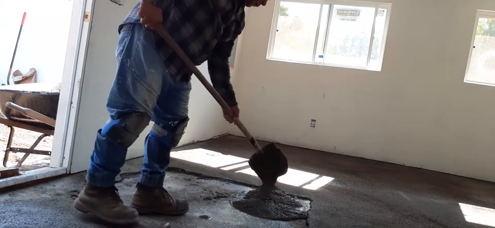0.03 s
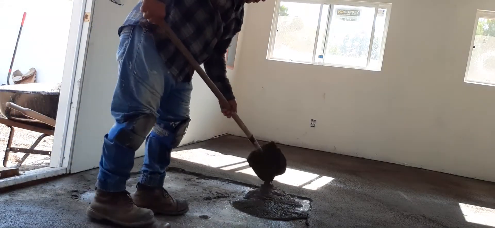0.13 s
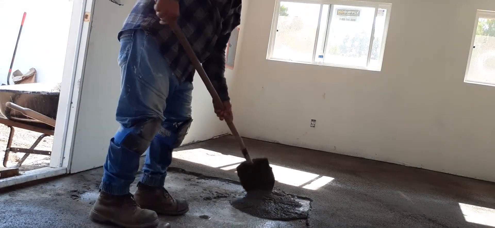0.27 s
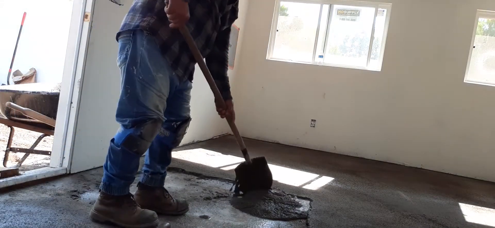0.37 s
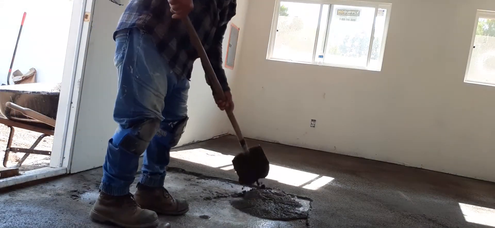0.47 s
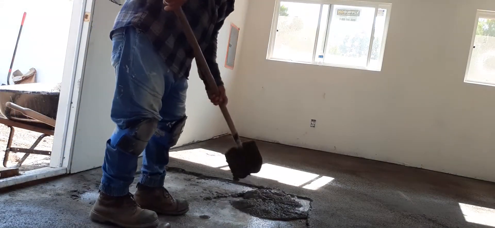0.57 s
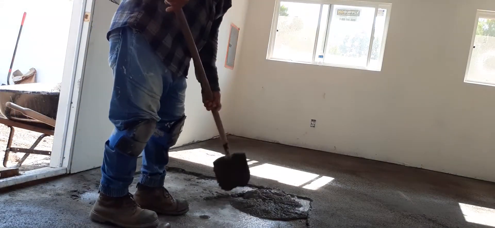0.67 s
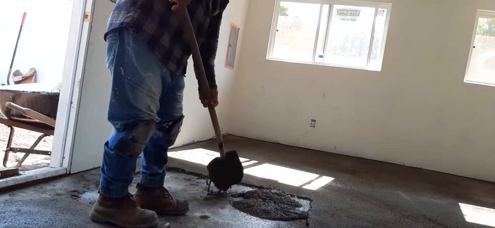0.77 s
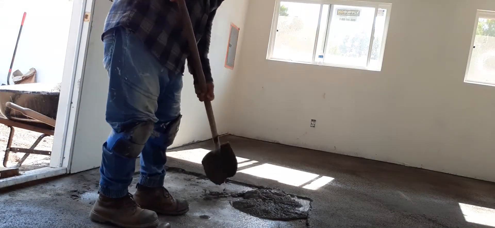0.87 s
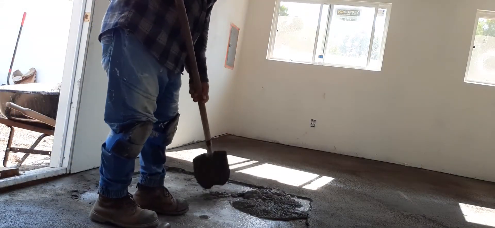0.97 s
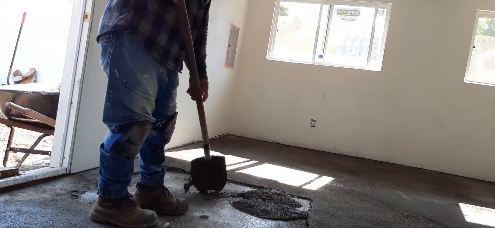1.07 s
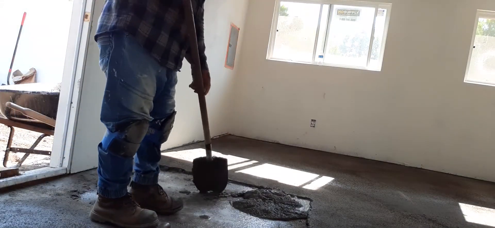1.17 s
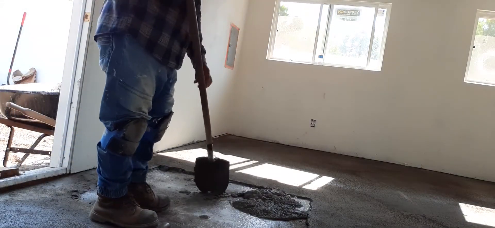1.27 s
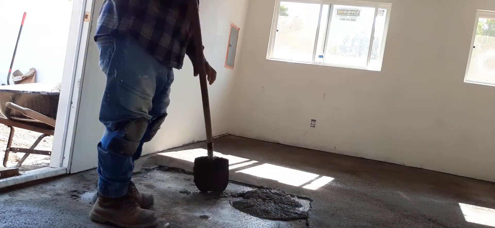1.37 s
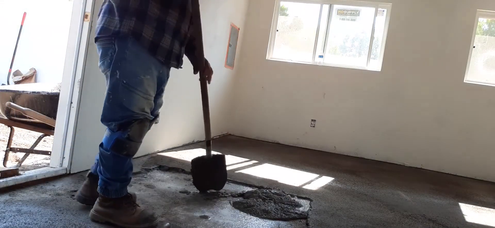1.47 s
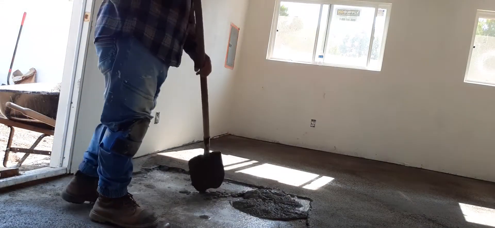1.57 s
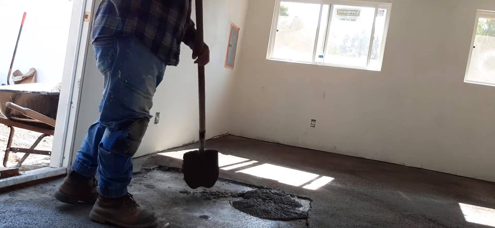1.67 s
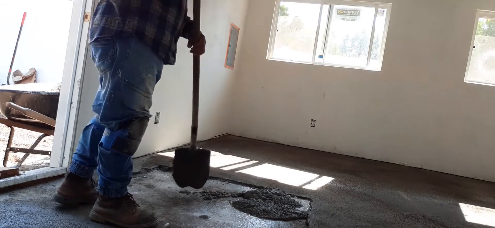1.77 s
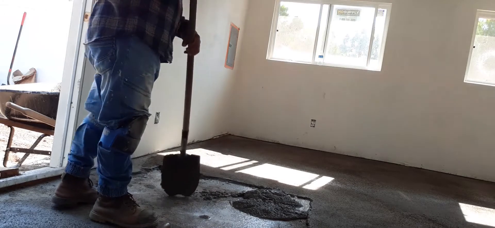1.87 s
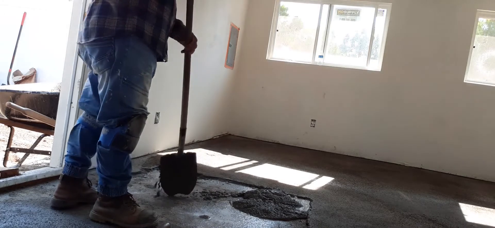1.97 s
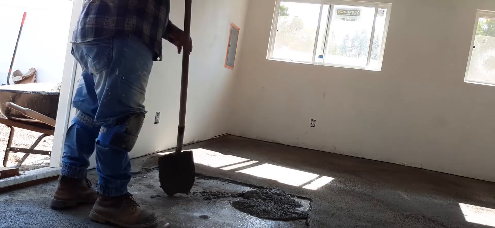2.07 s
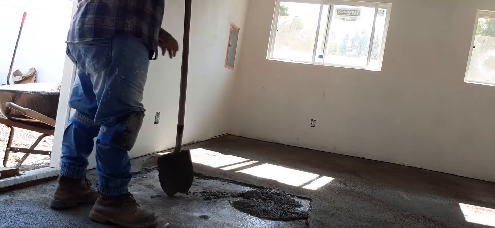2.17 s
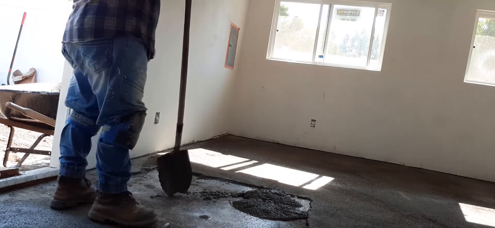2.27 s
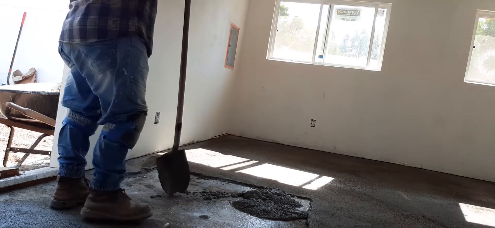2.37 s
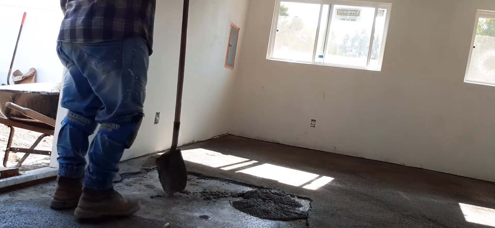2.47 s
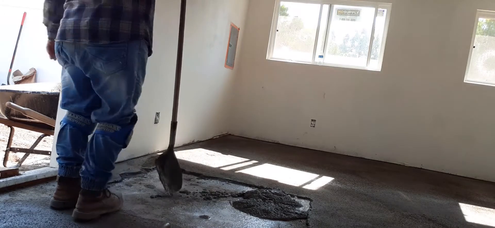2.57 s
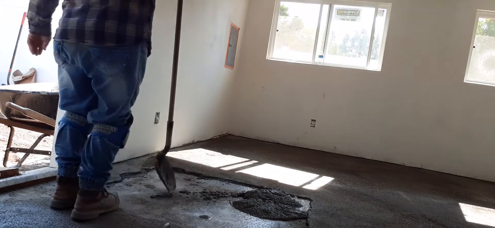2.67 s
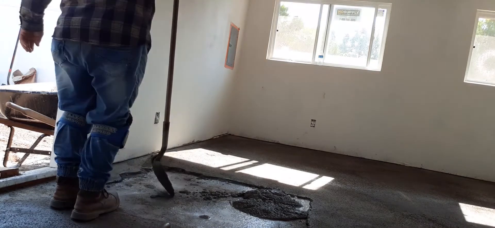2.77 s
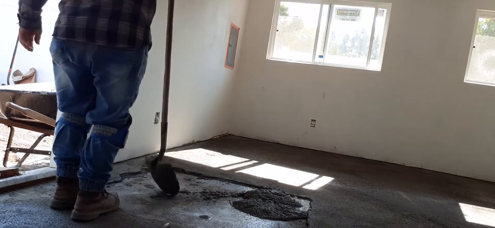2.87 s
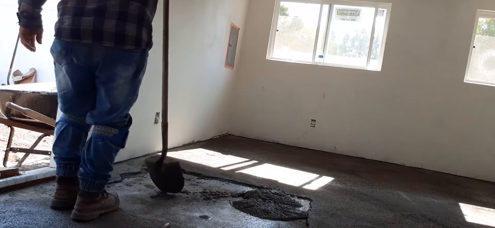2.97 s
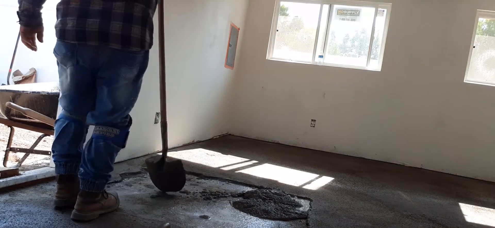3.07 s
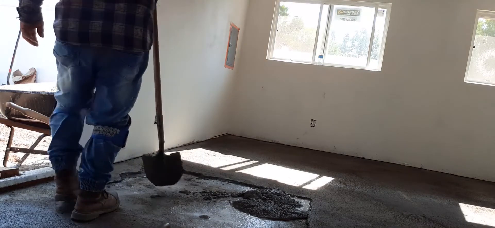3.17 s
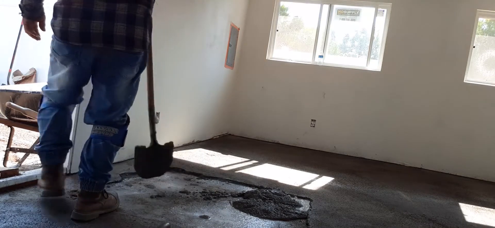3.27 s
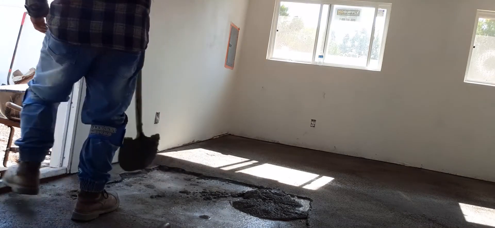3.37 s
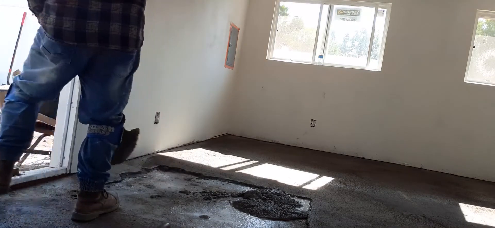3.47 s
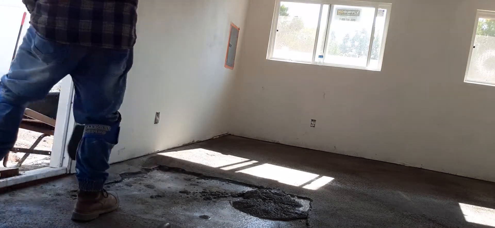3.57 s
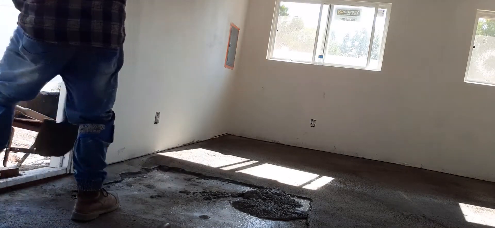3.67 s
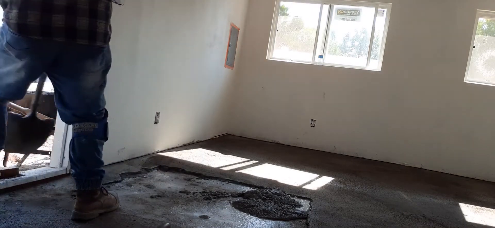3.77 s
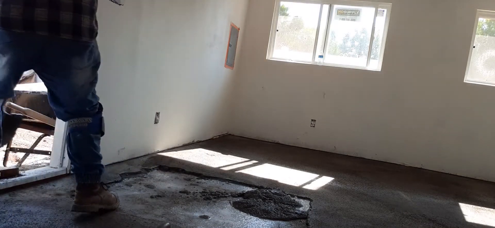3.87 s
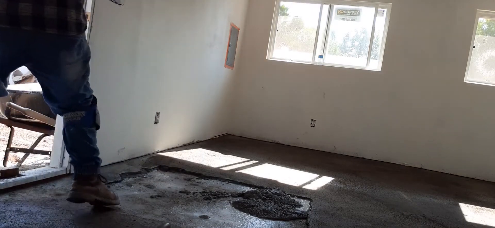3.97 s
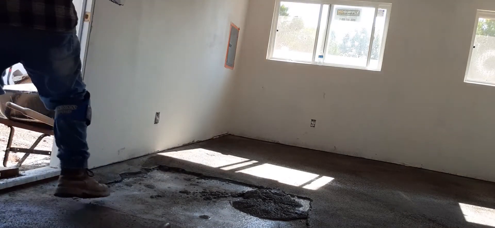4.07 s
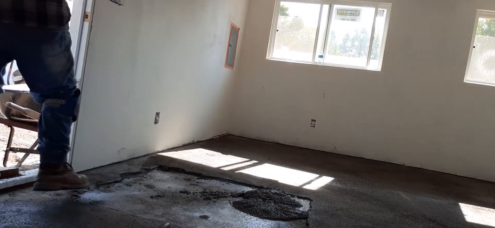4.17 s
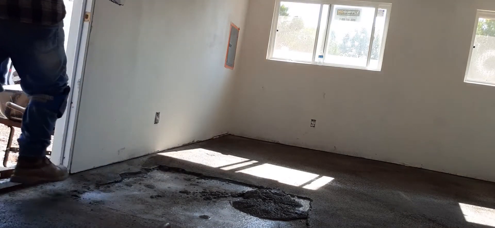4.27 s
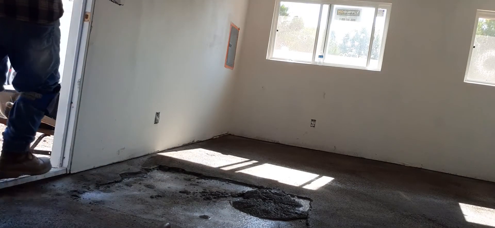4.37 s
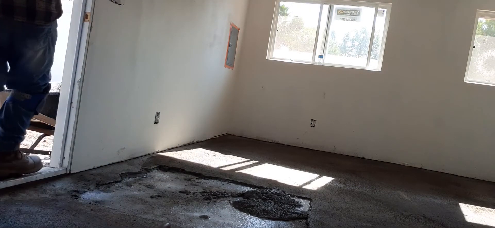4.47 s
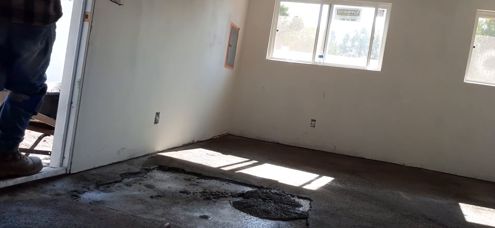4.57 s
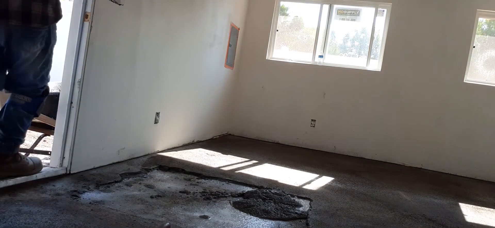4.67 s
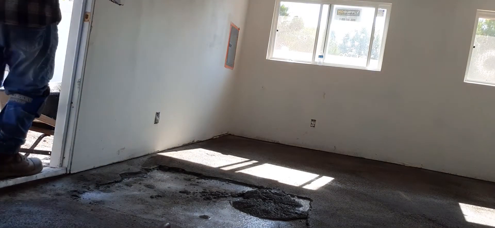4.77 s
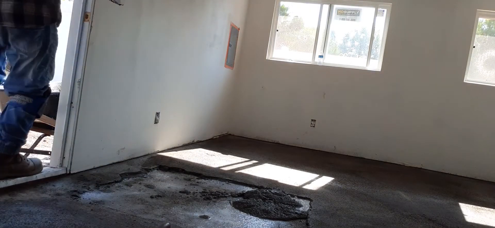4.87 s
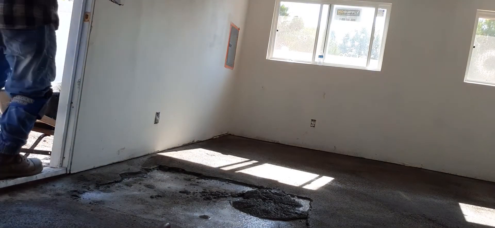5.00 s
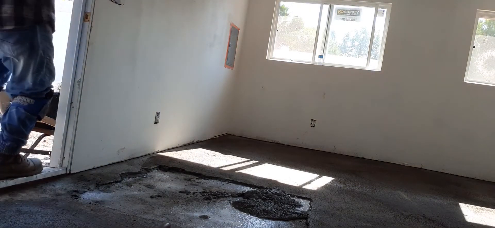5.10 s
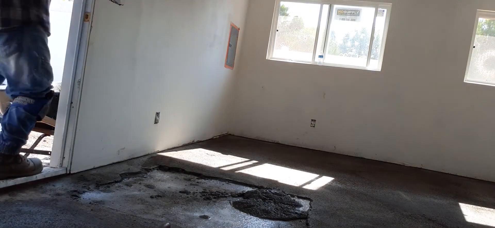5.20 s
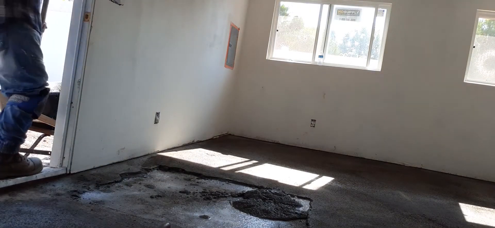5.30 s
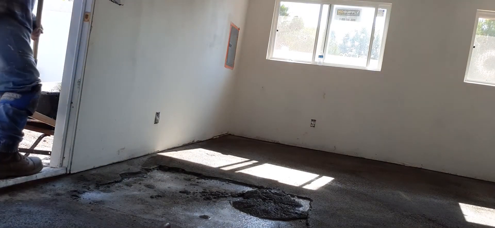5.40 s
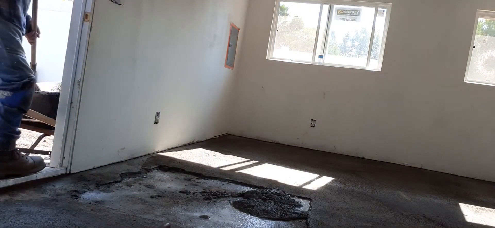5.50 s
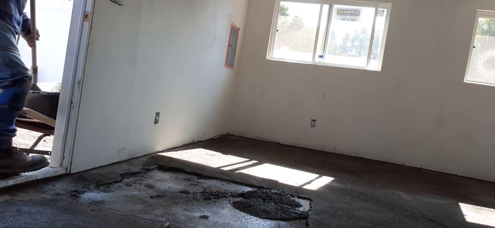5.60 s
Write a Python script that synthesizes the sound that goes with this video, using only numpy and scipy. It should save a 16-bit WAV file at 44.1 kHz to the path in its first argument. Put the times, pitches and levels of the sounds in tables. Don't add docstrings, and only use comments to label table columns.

```python
import sys
import numpy as np
from scipy import signal
from scipy.fft import rfft, irfft, next_fast_len
from scipy.io import wavfile
from scipy.ndimage import map_coordinates

SR = 44100
rng = np.random.default_rng(int(sys.argv[2]) if len(sys.argv) > 2 else 0)


def undo_db(level):
    steps = np.asarray(level, float) / 20
    return 10 ** steps


def transcribe(signal):
    frames = np.atleast_2d(signal).T
    limited = np.clip(frames, -1, 1)
    pcm = np.round(limited * 32767).astype(np.int16)
    wavfile.write(sys.argv[1], SR, pcm)


N = 248724


def unit(x):
    return x / np.sqrt(np.mean(x ** 2) + 1e-20)


def along(points, hz):
    point_hz, value = np.transpose(points)
    return np.interp(np.log(hz + 1), np.log(point_hz + 1), value)


def filtered(x, response):
    size = next_fast_len(x.shape[-1] + 8192)
    spectrum = rfft(x, size) * response(np.fft.rfftfreq(size, 1 / SR))
    return irfft(spectrum, size)[..., :x.shape[-1]]


def highpass(hz):
    return lambda f: 1j * f / (1j * f + hz)


def coloured(points):
    def response(hz):
        cepstrum = irfft(np.log(undo_db(along(points, hz)) + 1e-6))
        half = len(cepstrum) // 2
        cepstrum[1:half] *= 2
        cepstrum[half + 1:] = 0
        return np.exp(rfft(cepstrum))
    return response


def gritty(size, spread_db):
    grain_db = spread_db * rng.standard_normal(size // 64 + 1).repeat(64)[:size]
    return unit(rng.standard_normal(size) * undo_db(grain_db))


# pitch_hz, width_hz, level_db
BLADE_MODES = [(767, 96, -2), (941.5, 6.4, 15), (1180, 20, -13), (1920, 130, -7), (2178, 50, 1.5),
               (2360, 380, -8.5), (4030, 190, -8.5), (8700, 570, -16)]


def blade(f):
    response = 0
    for k, (mode_hz, width_hz, db) in enumerate(BLADE_MODES):
        mode = 1j * f * width_hz / (mode_hz ** 2 - f ** 2 + 1j * f * width_hz)
        response = response + (-1) ** k * undo_db(db) * mode
    return response


# start_s, left_over_right_db, ring_time_stretch
POSITION = [(0, 4.5, 0.97), (2.2, 3, 0.96), (2.8, 3.9, 0.6), (3.6, 7, 0.63), (4.5, 5, 0.69), (5.6, 6, 1.64)]
# pitch_hz, t60_s
GARAGE_DECAY = [(100, 0.16), (260, 0.75), (700, 1), (1840, 1), (4850, 0.97), (12800, 0.73)]
# pitch_hz, side_over_mid_db
DIFFUSE_WIDTH = [(60, -19), (200, -18), (380, -6), (700, -2), (1290, 4), (2380, -1.5), (4400, 1.5),
                 (8120, -4), (12000, -6), (16000, -9)]
# pitch_hz, share
SIDE_SHARE = [(200, -0.47), (600, 0.053), (1200, 0.98), (2500, 1.28), (5000, 0.37), (9000, 1.36),
              (14000, 0.11)]
# pitch_hz, level_db
ROOM_MODES = [(112, -17.5), (171, -27.5), (241, -26), (273, -21.5), (431, -25.5), (475, -34), (602, -22),
              (721, -22.5)]


def add(mix, dry, start_s, room_db):
    when, *place = np.transpose(POSITION)
    step_db, live = (np.interp(start_s, when, column) for column in place)
    hz, t, z = signal.stft(rng.standard_normal((2, SR)), SR, nperseg=256)
    z = z * undo_db(-60 * t / live / along(GARAGE_DECAY, hz)[:, None])
    z[1] *= undo_db(along(DIFFUSE_WIDTH, hz))[:, None]
    mid, side = signal.istft(z, SR, nperseg=256)[1]
    t = np.arange(len(mid)) / SR
    for mode_hz, db in ROOM_MODES:
        decay_db = -60 * t / live / along(GARAGE_DECAY, mode_hz)
        wave = np.sin(2 * np.pi * (mode_hz * t + rng.random()))
        mid += undo_db(db + rng.normal(0, 0.99) + decay_db) * wave
    build = 1 - np.exp(-(t / 0.007) ** 2)
    paths = undo_db(room_db) * build * np.array([mid + side, mid - side]) / np.linalg.norm(mid)
    paths[:, 0] += 1
    paths = filtered(paths, lambda f: undo_db(step_db * along(SIDE_SHARE, f) * [[0.5], [-0.5]]))
    heard = signal.fftconvolve(dry[None], paths, axes=1)
    start = round(start_s * SR)
    mix[:, start:start + heard.shape[1]] += heard[:, :N - start]


# start_s, level_db, thump_hz, spatter_t60_s, room_db
BLOWS_ON_SLAB = [
    (0.303, 0, 440, 0.32, 1.5),
    (0.714, 1.5, 493, 0.24, 2.5),
    (1.025, -3.5, 413, 0.02, 7),
    (1.885, -11, 432.6, 0.083, 7.5),
]
# pitch_hz, level_db
LOAD_COLOURS = [
    [(29, -85), (50, -23), (135, -10), (208, -8), (252, -6.5), (472, -15.5), (630, -4.5), (1270, -14.5),
     (1500, -18), (1780, -21.5), (3500, -31.5), (11700, -30), (16000, -36)],
    [(29, -33), (50, -43), (81, -23.5), (213, -11), (284, -7), (398, -8), (439, -8), (973, -17.5),
     (1050, -16), (2880, -38), (6550, -43), (12000, -37), (16000, -51)],
    [(29, -97.5), (50, -45), (81, 3.5), (135, -26), (234, 3.5), (362, -7.5), (601, 1), (1050, -3.5),
     (1270, -19), (2380, -21), (3410, -27.5), (10900, -35), (16000, -42)],
    [(29, -99), (50, -22), (264, -5), (472, -6.5), (822, -15), (950, -6), (1430, -20), (2490, -20.5),
     (3410, -32.5), (4140, -23), (6090, -34.5), (12000, -28.5), (16000, -42.5)],
]
BLADE_RING = [-44, -33, -77, -38]
# delay_s, size
FAR_EDGE = [(.0028, 2.49), (.0042, 0.2), (.0058, 1.1), (.006, 0.12)]
BLOW_DELAY = [0, .0018, .001, .0015]


def blows():
    mix, t = np.zeros((2, N)), np.arange(SR // 5) / SR
    parts = zip(BLOWS_ON_SLAB, LOAD_COLOURS, BLADE_RING, FAR_EDGE, BLOW_DELAY)
    for (s, db, thump_hz, spatter_s, room_db), colour, ring_db, (lag_s, slap), late_s in parts:
        push = np.exp(-((t - 0.0018) * thump_hz * 4.94) ** 2)
        recoil = np.exp(-((t - 0.0008) * thump_hz * 15.4) ** 2)
        contact = (push - 0.52 * recoil) / push.sum()
        contact = contact + slap * np.roll(contact, round(lag_s * SR))
        burst = 1 - np.exp(-t / 0.003) + 1.5 * np.exp(-t / 0.0015)
        spray = gritty(len(t), spread_db=2.5) * undo_db(-60 * t / spatter_s) * burst
        spray = filtered(spray / np.linalg.norm(spray), highpass(1300))
        body = filtered(contact + 0.59 * spray, coloured(colour))
        ring = filtered(spray + contact, blade)
        blow = body / np.abs(body).max() + undo_db(ring_db) * ring / np.abs(ring).max()
        add(mix, undo_db(db - 3.0) * blow, s + late_s, room_db)
    return mix


# pitch_hz, level_db
WEIGHT_COLOUR = [(50, 13), (120, -1), (250, -4.5), (500, 1.5), (900, -4), (1600, -15), (3000, -34.5),
                 (8000, -58)]
# pitch_hz, level_db
SOLE_COLOUR = [(300, -17.5), (600, 4), (1000, 7), (1800, 7), (2600, -1.5), (3600, -8), (6000, -15.5),
               (12000, -39)]
# pitch_hz, level_db
SAND_COLOUR = [(1470, -66), (2500, 0), (3550, -8), (4020, -3.5), (8140, -6), (8800, -9.5), (10900, -4),
               (15200, -10.5), (16000, -49)]


def grit(weight_db, steel, low_hz, sand_db):
    size = round(0.4 * SR)
    weight = filtered(gritty(size, spread_db=4.5), coloured(WEIGHT_COLOUR))
    weight = unit(filtered(weight, lambda f: highpass(low_hz)(f) ** 2))
    ring = unit(filtered(gritty(size, spread_db=2), blade))
    sole = unit(filtered(gritty(size, spread_db=1.0), coloured(SOLE_COLOUR)))
    scrape = unit(steel * ring + (1 - steel) * sole)
    hiss = unit(filtered(gritty(size, spread_db=-2.0), coloured(SAND_COLOUR)))
    crushed = rng.random(size) < 200 / SR
    crunch = crushed * undo_db(3.5 * rng.standard_normal(size))
    crunch = unit(filtered(crunch, lambda f: coloured(SOLE_COLOUR)(f) / (1 + 1j * f / 2500) ** 2))
    return undo_db(weight_db) * weight + scrape + undo_db(sand_db) * hiss + 0.4 * crunch


def drag(strokes, weight_db, steel, low_hz):
    mix = np.zeros((2, N))
    for s, rise_s, fade_s, db, sand_db in strokes:
        t = np.arange(round(min(rise_s + fade_s, 0.4) * SR)) / SR
        judder_db = 3 * map_coordinates(rng.standard_normal(40), [t * 47.1])
        ease_db = -34.5 * np.maximum(t - rise_s, 0) / fade_s
        lift = np.minimum((t[-1] - t) / 0.02, 1)
        pressure = np.minimum(t / rise_s, 1) ** 0.94 * undo_db(ease_db + judder_db) * lift
        layers = grit(weight_db, steel, low_hz, sand_db)[:len(t)]
        add(mix, undo_db(db - 9.5) * pressure * layers, s, room_db=3.5)
    return mix


# start_s, rise_s, fade_s, level_db, sand_over_scrape_db
BOOT_SCUFFS = [(0.105, 0.012, 0.9, -47.5, 4), (0.17, 0.017, 0.1, -36, -8), (2.582, 0.047, 0.29, -46.5, -9),
               (3.62, 0.12, 0.29, -34, -13), (4.475, 0.093, 0.45, -42.5, -8.5)]
# start_s, rise_s, fade_s, level_db, sand_over_scrape_db
LIGHT_SHUFFLES = [(0.0, 0.0013, 0.14, -49, 4), (1.44, 0.0047, 0.34, -50, 1.5),
                  (1.55, 0.027, 0.042, -42.5, -3.5), (1.705, 0.01, 0.81, -54, 5.5),
                  (2.2, 0.09, 1, -59.5, 6), (2.618, 0.01, 0.24, -52.5, 10), (3.905, 0.053, 0.1, -46, -11),
                  (4.095, 0.03, 0.67, -51.5, -15), (4.245, 0.0065, 0.2, -50, -20),
                  (4.595, 0.012, 0.06, -35.5, -6)]
# start_s, rise_s, fade_s, level_db, sand_over_scrape_db
EDGE_SCRAPES = [(2.85, 0.0071, 0.42, -29.5, -2.5)]
# start_s, rise_s, fade_s, level_db, sand_over_scrape_db
BARROW_DIGS = [(4.622, 0.0041, 0.34, -34, -10), (4.72, 0.037, 0.41, -52, 1),
               (5.42, 0.0027, 0.091, -34.5, -25), (5.535, 0.009, 0.048, -31, -11)]
# start_s, rise_s, fade_s, level_db, sand_over_scrape_db
DULL_SHOVES = [(3.598, 0.013, 0.18, -47, -4.5), (5.108, 0.008, 0.22, -53, -1.5),
               (5.3, 0.0071, 0.17, -54, -22), (5.366, 0.021, 0.064, -46, -26)]


def drags():
    return (drag(BOOT_SCUFFS, weight_db=5.26, steel=0.34, low_hz=124)
            + drag(LIGHT_SHUFFLES, weight_db=-11, steel=0.37, low_hz=75)
            + drag(EDGE_SCRAPES, weight_db=0.45, steel=0.5, low_hz=235)
            + drag(BARROW_DIGS, weight_db=4.9, steel=0.3, low_hz=470)
            + drag(DULL_SHOVES, weight_db=11.3, steel=0.077, low_hz=180))


# start_s, level_db, pitch_hz
BOOT_STEPS = [(0.182, -20, 208), (2.588, -34, 245), (3.603, -22.5, 277), (4.474, -30, 330),
              (5.112, -29, 373), (3.899, -38, 126), (4.268, -37, 126), (4.599, -39, 120), (4.749, -45, 145),
              (5.169, -40, 103)]


def steps():
    mix, t = np.zeros((2, N)), np.arange(SR // 10) / SR
    for s, db, hz in BOOT_STEPS:
        push = np.sin(2 * np.pi * hz * t) * t * hz * np.exp(-t * hz * 2.3)
        add(mix, undo_db(db + 9.0) * filtered(push, highpass(hz)), s, room_db=1.5)
    return mix


# start_s, level_db, pitch_hz, t60_s, overtone_db
STEEL_CLANKS = [(0.1194, -43, 2290, 0.021, 1), (0.1522, -37.5, 1930, 0.021, 3),
                (1.8961, -19, 2430, 0.0089, 0), (4.6314, -26, 2033, 0.02, -10),
                (5.5371, -37.5, 1840, 0.028, -8)]
# ratio_to_lowest, level_db
OVERTONES = [(1.059, -10), (1.7, -11), (3.46, -24.5)]


def clanks():
    mix, t = np.zeros((2, N)), np.arange(SR // 20) / SR
    for s, db, hz, t60_s, over_db in STEEL_CLANKS:
        ring = np.sin(2 * np.pi * hz * t)
        for ratio, partial_db in OVERTONES:
            ring += undo_db(over_db + partial_db) * np.sin(2 * np.pi * ratio * hz * t)
        touch = 1 - np.exp(-t / 0.002)
        add(mix, undo_db(db + 9.5 - 60 * t / t60_s) * touch * ring, s, room_db=3.5)
    return mix


# start_s, level_db, pitch_hz
LOOSE_STONES = [(0.119, -41, 4960), (0.1468, -27, 4530), (0.1966, -29, 4630), (1.042, -35, 10300),
                (1.0475, -13.5, 9700), (1.448, -36, 7670), (2.6264, -37, 10100), (2.6838, -27.5, 4300),
                (2.8637, -14, 11400), (2.953, -15.5, 9600), (3.632, -33.5, 8000), (3.752, -28.5, 3580),
                (3.9103, -39, 4657), (3.924, -37.5, 8300), (4.2137, -43, 4070), (4.254, -37, 4350),
                (4.599, -27, 9800), (5.4296, -31, 4840)]


def stones():
    mix, t = np.zeros((2, N)), np.arange(SR // 50) / SR
    for s, db, hz in LOOSE_STONES:
        crack = rng.standard_normal(len(t)) * undo_db(-60 * t / 0.0092)
        click = filtered(crack, lambda f: 1j * f * hz / (hz * hz - f * f + 0.6j * f * hz))
        add(mix, undo_db(db - 8.0) * click, s, room_db=5.5)
    return mix


# pitch_hz, level_db
AIR_COLOUR = [(15, -42), (25, -8), (161, -4.5), (270, -10.5), (363, -6.5), (962, -11.5), (1100, -10),
              (1370, -21.5), (2280, -24.5), (2840, -39), (5000, -30.5), (12500, -40), (16000, -55)]


def air():
    mid, side = rng.standard_normal((2, N))
    side = filtered(side, lambda f: undo_db(along(DIFFUSE_WIDTH, f)))
    drift_db = 0.093 * map_coordinates(rng.standard_normal(20), [np.arange(N) * 3.8 / SR])
    murmur = filtered(np.array([mid + side, mid - side]), lambda f: undo_db(along(AIR_COLOUR, f)))
    return undo_db(-55.5 + drift_db) * unit(murmur)


def scene():
    return blows() + drags() + steps() + clanks() + stones() + air()


def band_limit(x):
    return signal.sosfilt(signal.butter(12, 16550, fs=SR, output="sos"), x)


def record(dry):
    mix = filtered(dry, lambda f: (f < 16000) * highpass(35)(f) ** 2)
    return band_limit(mix)


dry = scene()
out = record(dry)
transcribe(out)
```